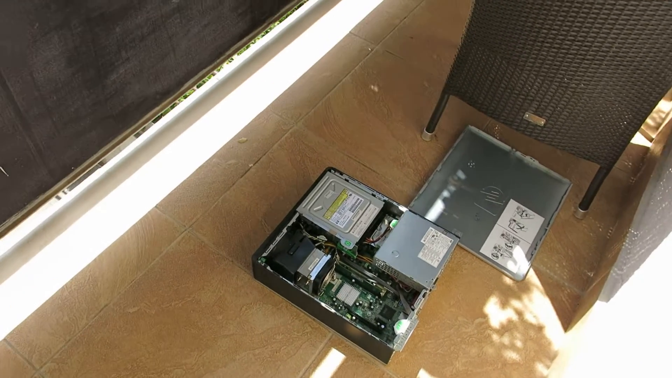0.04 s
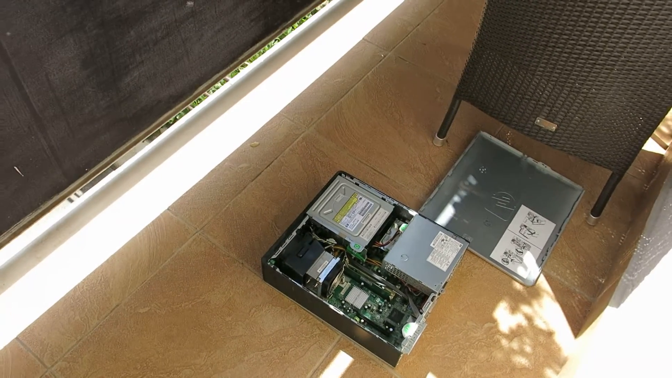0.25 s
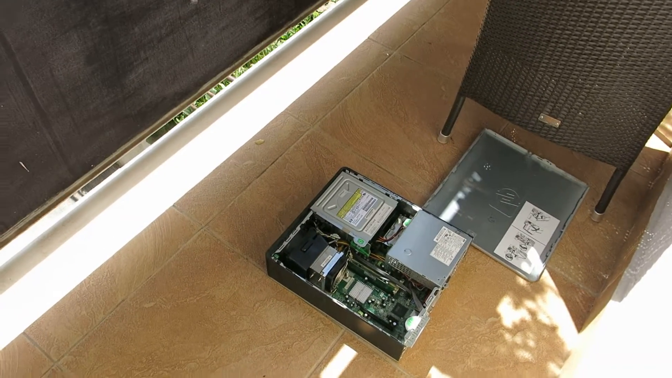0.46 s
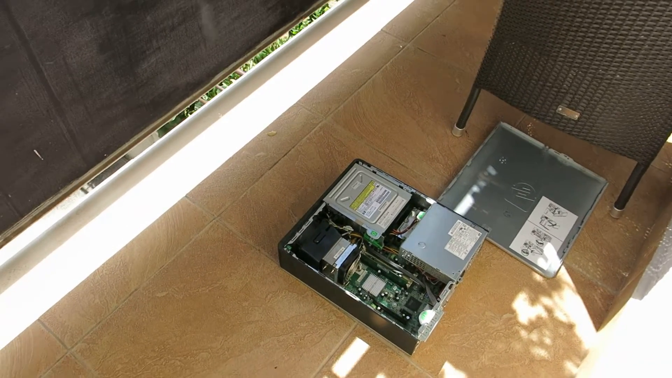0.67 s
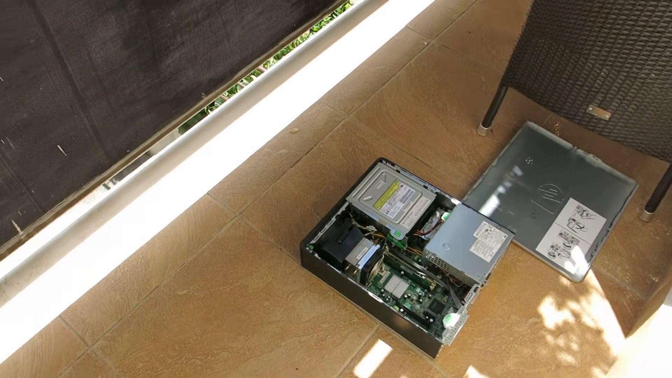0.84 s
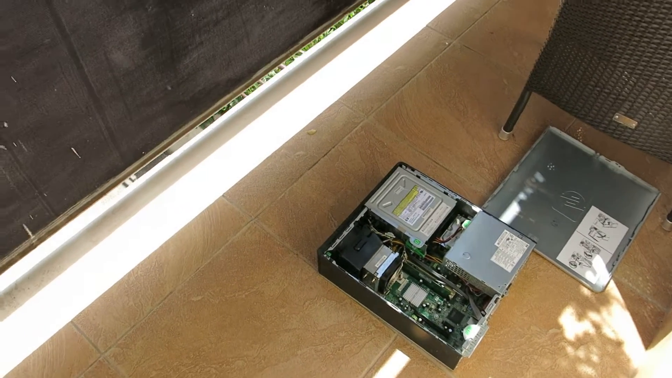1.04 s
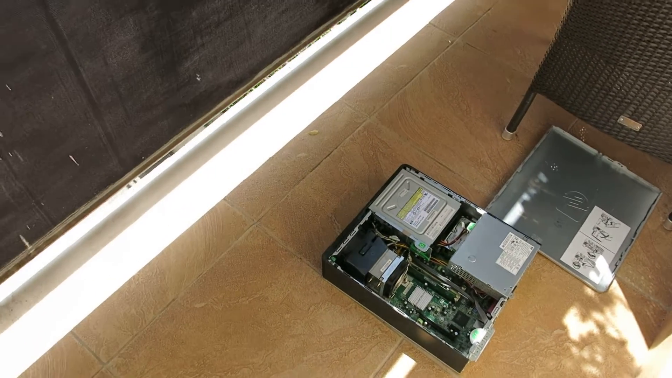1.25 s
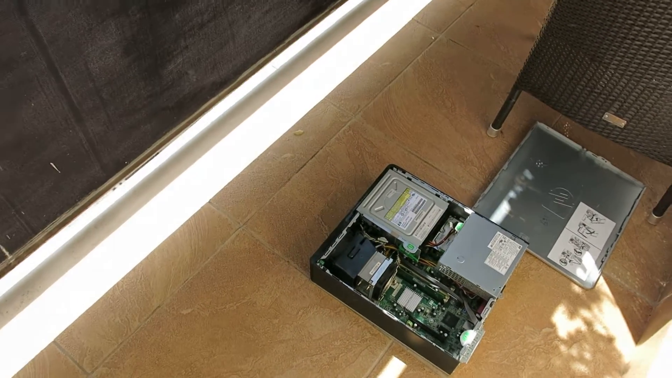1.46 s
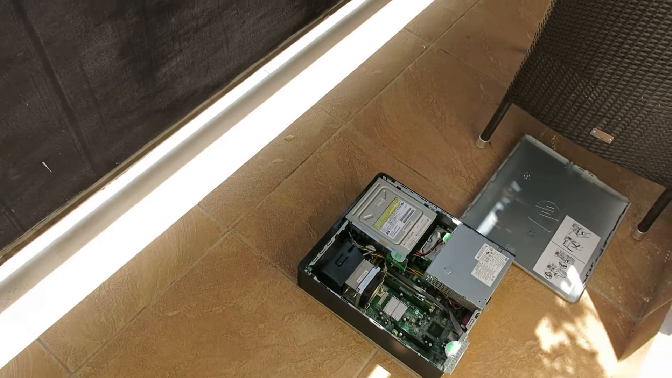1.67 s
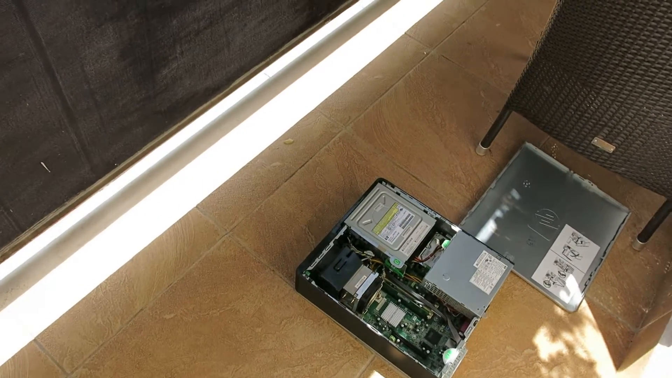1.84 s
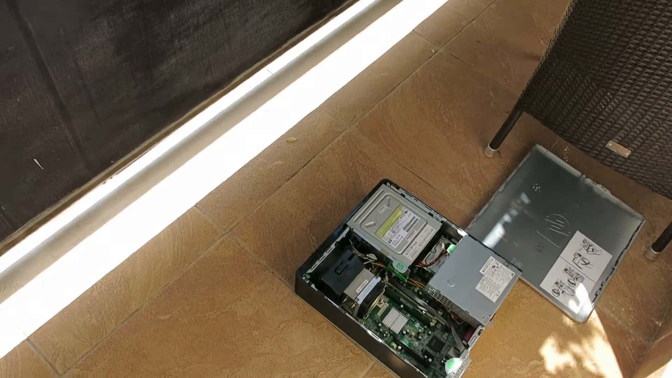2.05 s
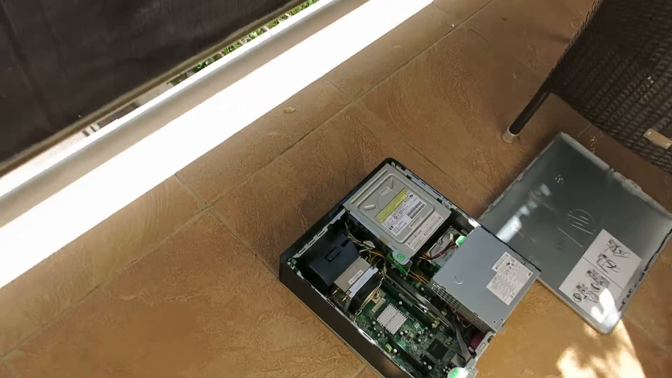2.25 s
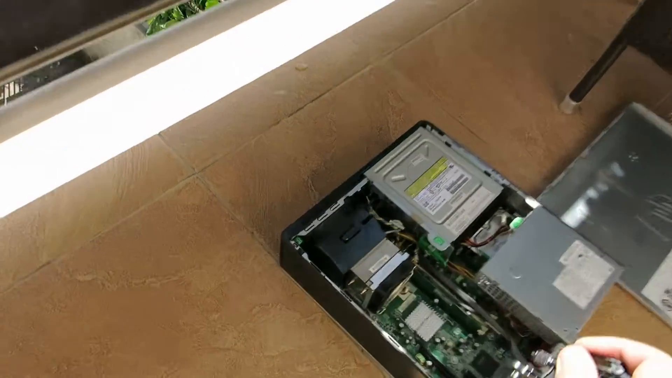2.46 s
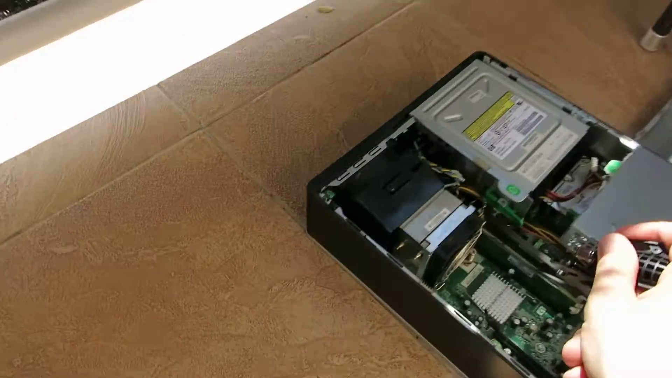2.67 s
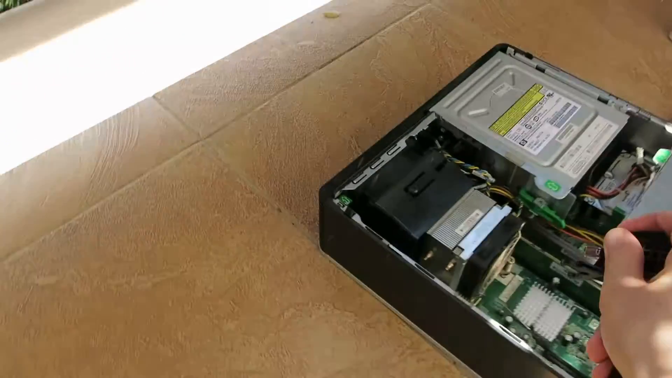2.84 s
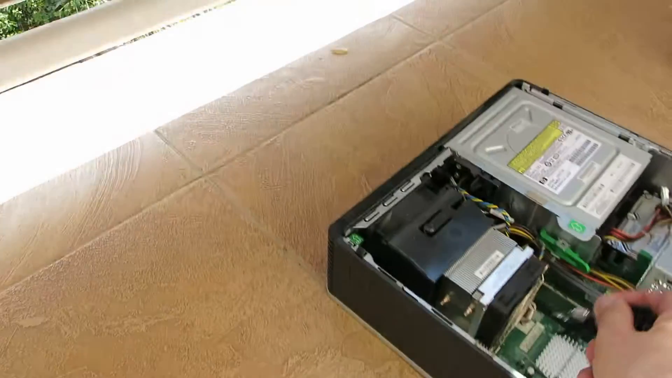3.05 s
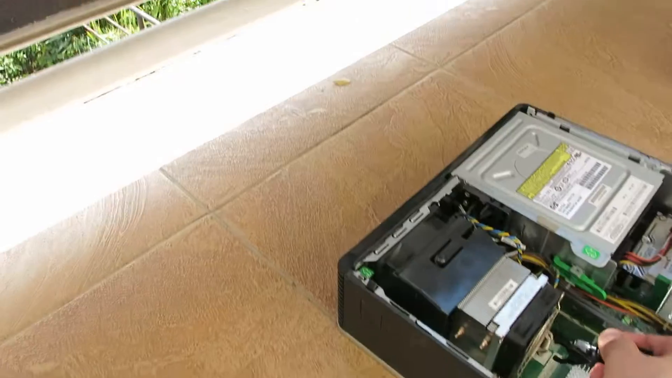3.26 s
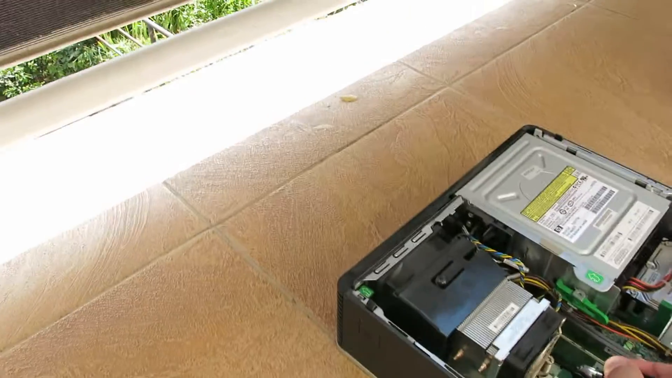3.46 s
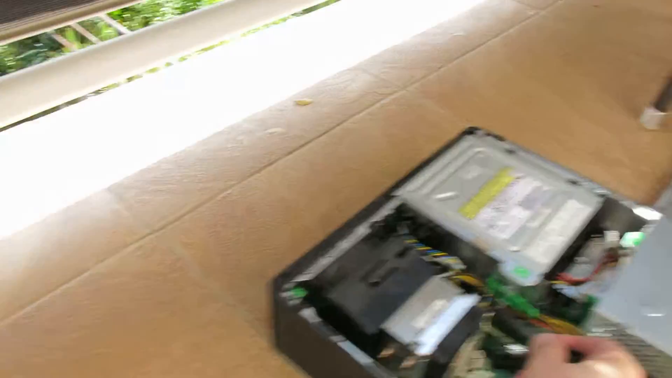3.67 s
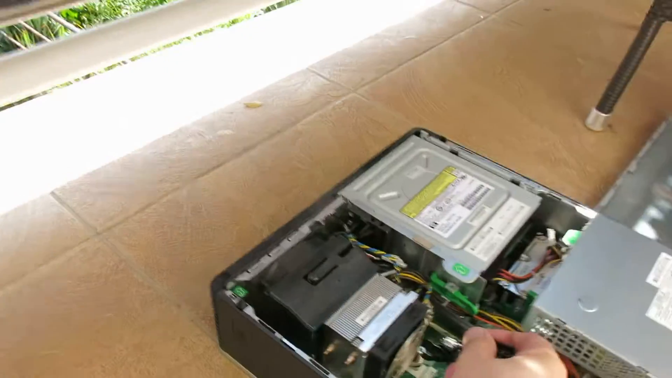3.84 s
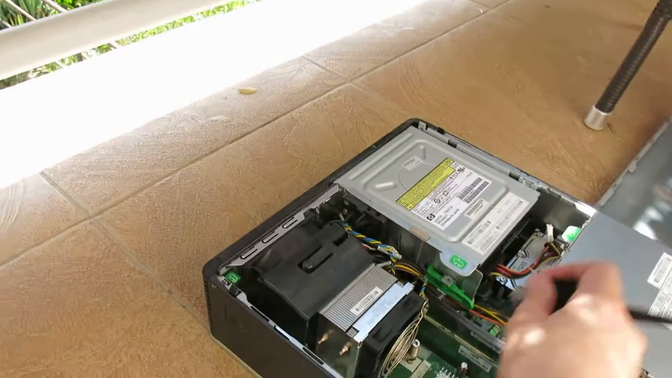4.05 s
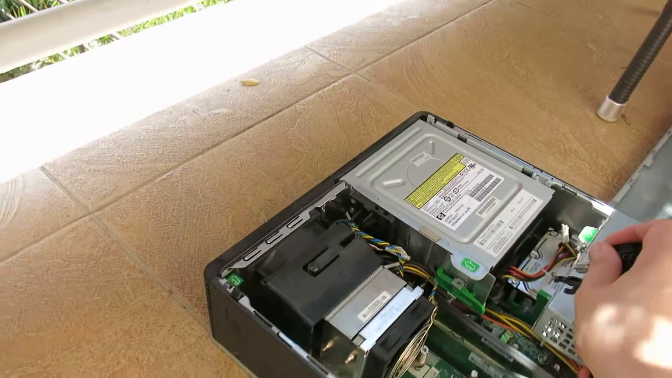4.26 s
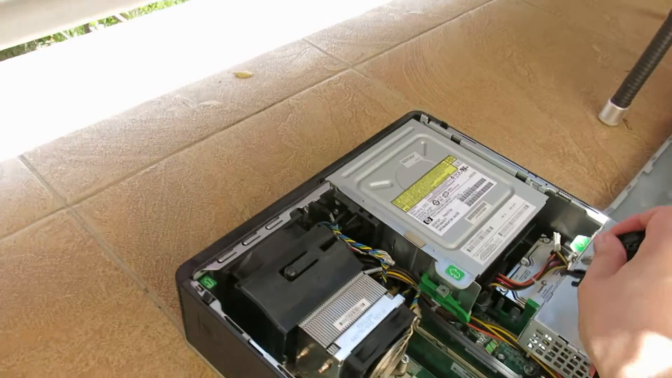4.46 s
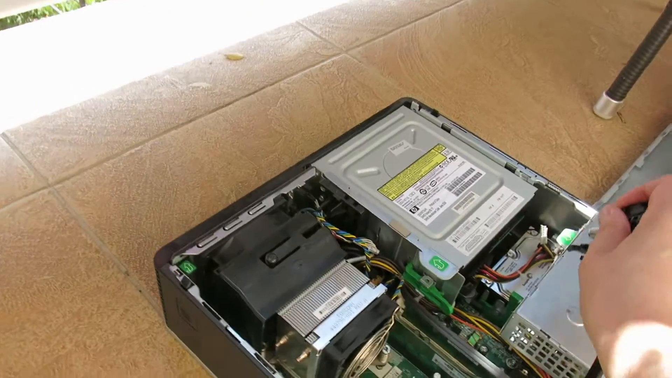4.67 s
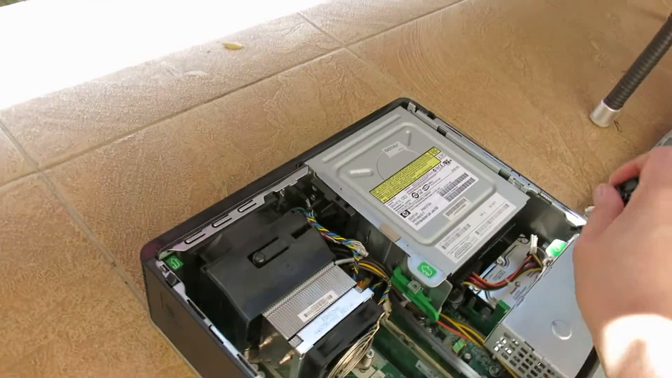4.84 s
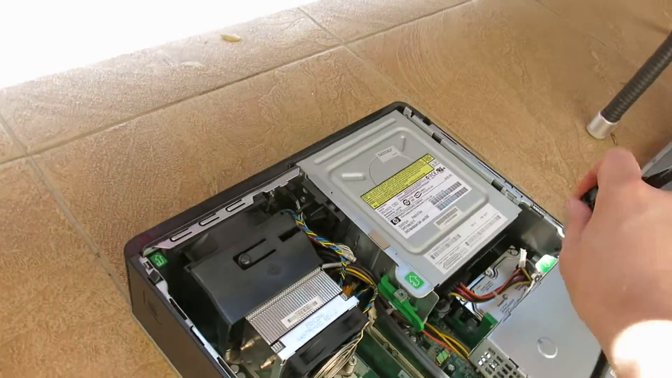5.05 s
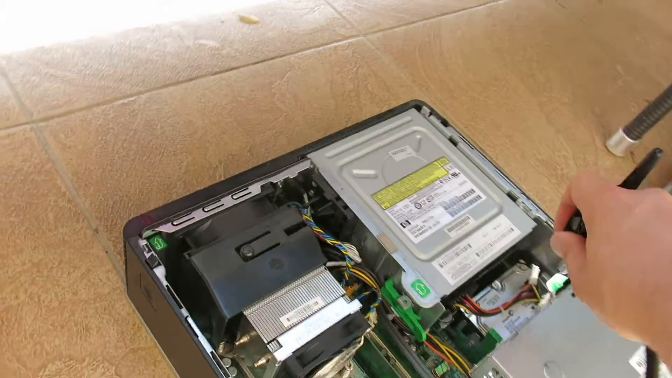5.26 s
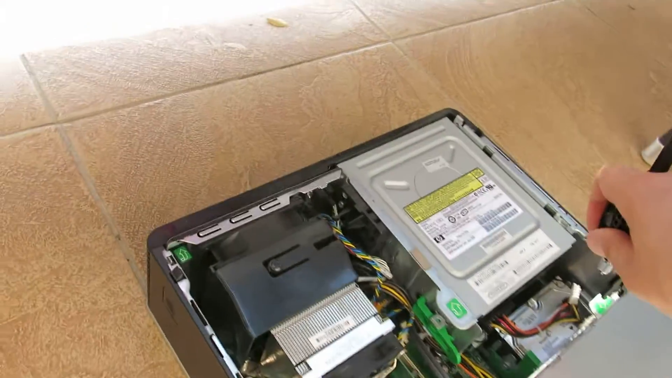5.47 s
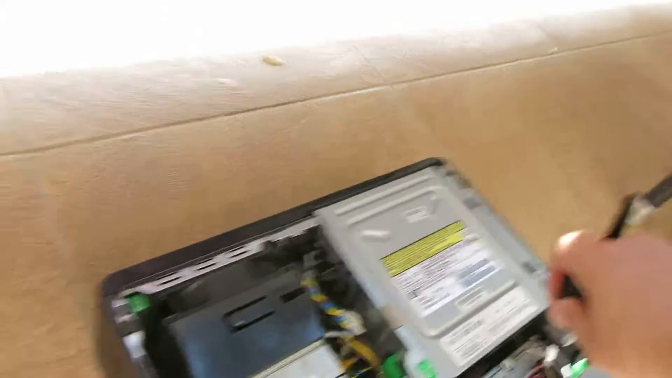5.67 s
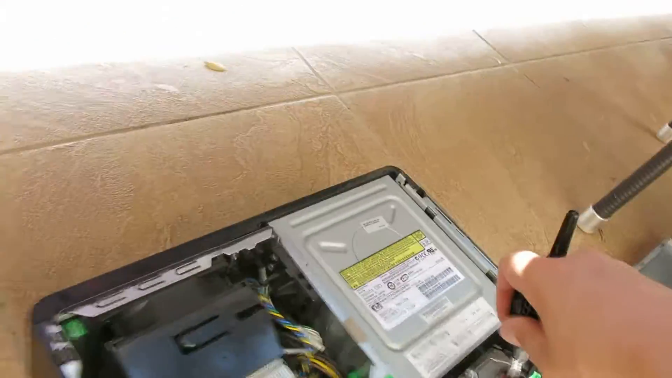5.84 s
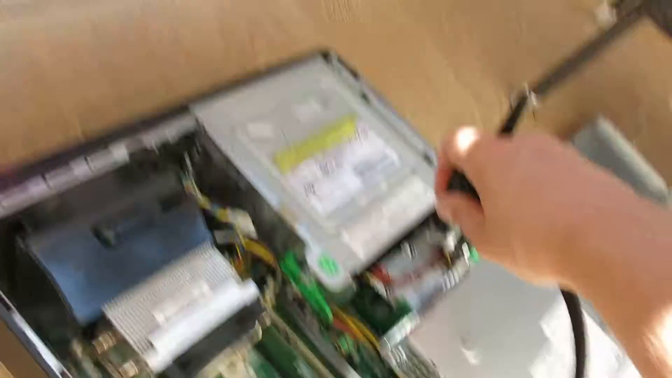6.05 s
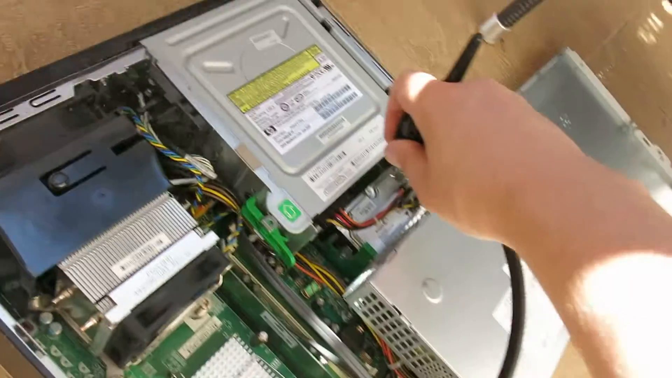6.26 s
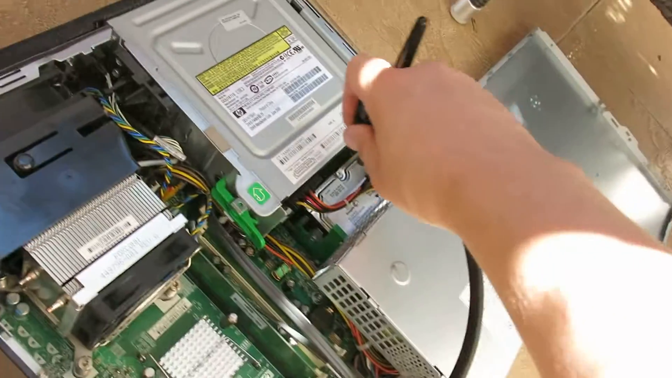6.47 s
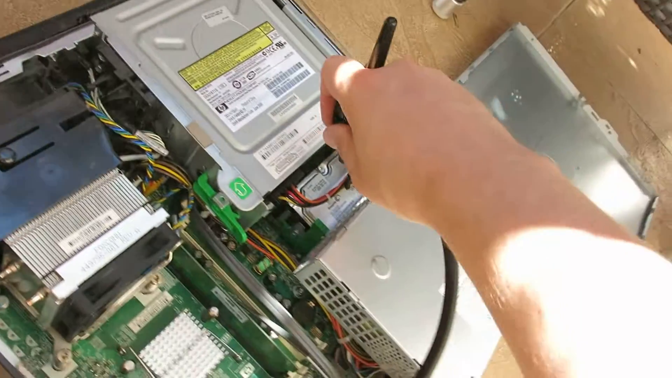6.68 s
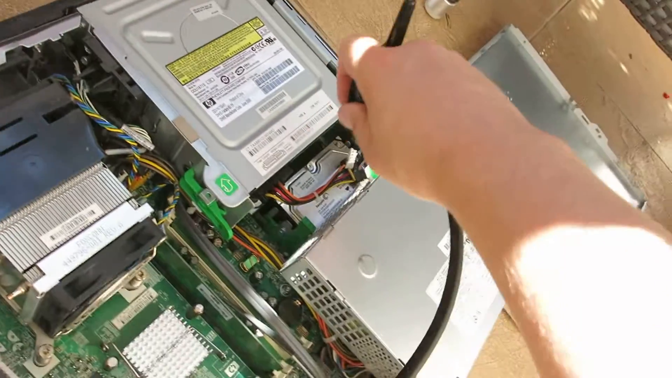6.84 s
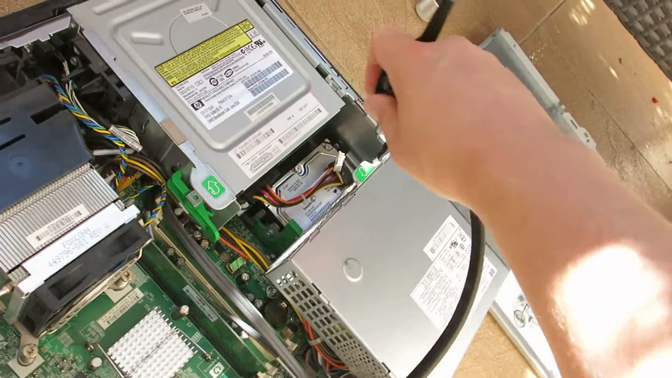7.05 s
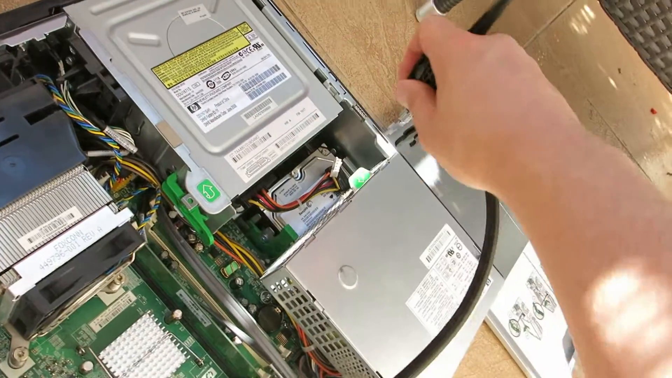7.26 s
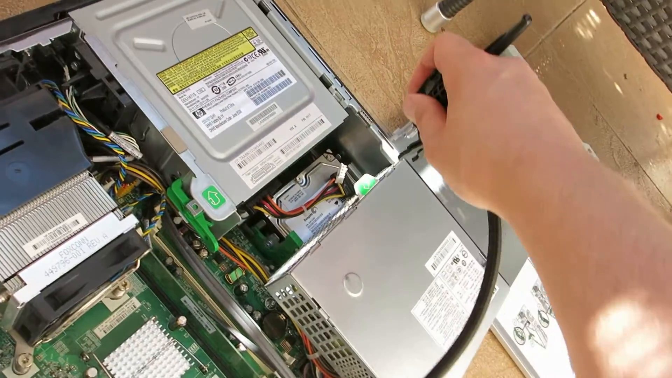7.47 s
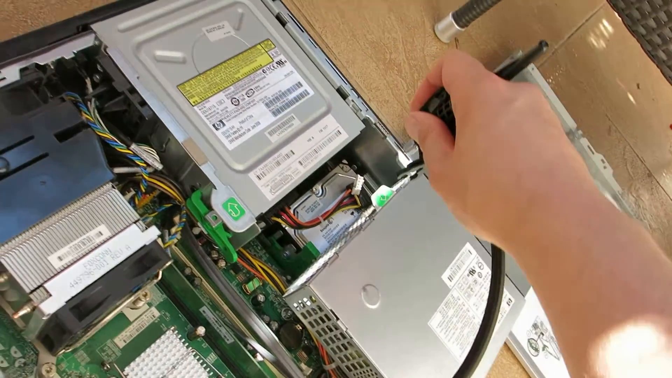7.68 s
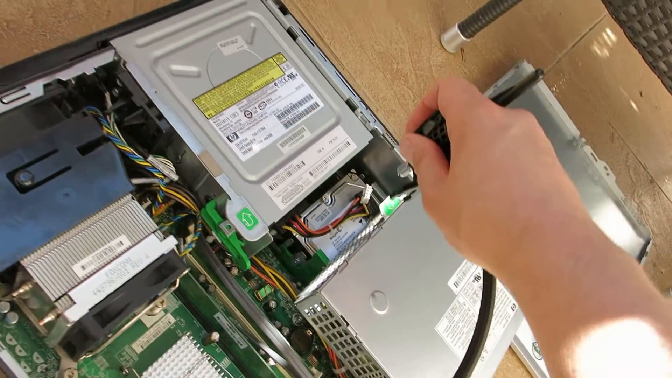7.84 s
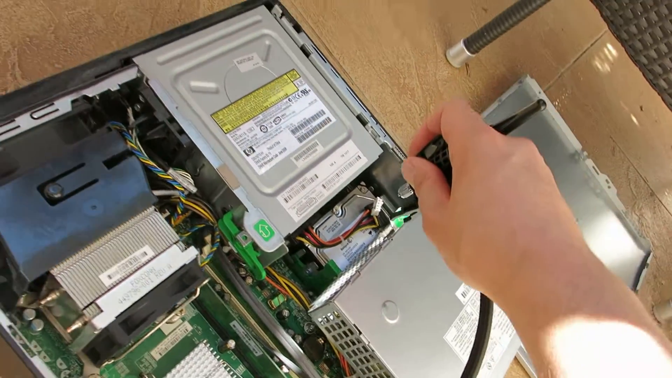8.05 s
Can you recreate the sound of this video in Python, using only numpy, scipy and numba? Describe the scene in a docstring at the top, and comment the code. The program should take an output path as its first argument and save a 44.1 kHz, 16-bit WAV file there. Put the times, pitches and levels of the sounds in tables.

```python
"""A machine drones outside a balcony, a blow gun clicks in the hand and its hose slides; then the valve opens.
The air jet hisses across the circuit board, drive bay and sheet-metal edges of an open computer case, whistles
in slots and rings the hollows. Machine and whistles are wavering sines and narrow noise; the air is coloured
noise whose levels follow the sweep. A phone close by turns its gain down on loud sound, pushing the drone down."""
import sys
import numpy as np
from scipy import signal
from scipy.fft import irfft, next_fast_len
from scipy.io import wavfile
from scipy.ndimage import uniform_filter1d
from numba import njit

SR = 44100
rng = np.random.default_rng(int(sys.argv[2]) if len(sys.argv) > 2 else 0)


def persist_wave(psi):
    """Save psi, clipped to +-1, as 16-bit WAV."""
    counts = np.round(np.clip(psi, -1, 1) * 32767).astype(np.int16)
    wavfile.write(sys.argv[1], SR, np.atleast_2d(counts).T)


N = 357651

T = np.arange(N) / SR
FREQS = np.maximum(np.arange(N // 2 + 1) * SR / N, 1)
GAIN_RANGE_DB = 21  # how far the phone can turn down

# All table levels are mix levels, before the lift of the jet in scene() and the phone's gain in record().


def undb(db):
    """Decibels to gain."""
    return 10 ** (np.asarray(db) / 20)


def curves(table):
    """The columns of a table, joined by straight lines in time."""
    s, *columns = np.transpose(table)
    return [np.interp(T, s, column) for column in columns]


def colour(points):
    """Gain at every frequency from (Hz, dB) points, joined along log frequency."""
    hz, db = np.transpose(points)
    return undb(np.interp(np.log(FREQS), np.log(hz), db))


def resonance(hz, half_width_hz):
    """Steep-sided gain of one resonance, halved at half_width_hz from its centre."""
    return 1 / (1 + ((FREQS - hz) / half_width_hz) ** 2)


def unit(x):
    """Scale a stereo sound so that its centre has rms 1."""
    centre = x.mean(axis=0)
    return x / np.sqrt(np.mean(centre ** 2))


def noise(gain, likeness):
    """Stereo noise of a given colour; likeness is the share of its power common to both sides."""
    size = next_fast_len(N, True)
    bins = np.arange(size // 2 + 1) * SR / size
    z = rng.standard_normal((3, len(bins))) + 1j * rng.standard_normal((3, len(bins)))
    gain = np.array([np.interp(bins, FREQS, g) for g in np.atleast_2d(gain)])
    spectrum = gain * (np.sqrt(likeness) * z[0] + np.sqrt(1 - likeness) * z[1:])
    return unit(irfft(spectrum, size)[:, :N])


def walk(rate_hz):
    """Smooth random drift with a spread of 1, drawing about rate_hz new values a second."""
    hold = max(int(SR / rate_hz), 1)
    steps = rng.standard_normal(4096)[np.arange(N) // hold % 4096]
    slewed = uniform_filter1d(uniform_filter1d(steps, hold), hold)
    return slewed / slewed.std()


def swell(s, spread_s):
    """A bell-shaped rise and fall centred on s."""
    return np.exp(-.5 * np.minimum(((T - s) / spread_s) ** 2, 100))


def ramp(s, length_s):
    """A smooth step from 0 to 1, half way up at s."""
    return .5 + .5 * np.sin(np.pi * np.clip((T - s) / length_s, -.5, .5))


# tones of the droning machine: pitch_hz, waver_hz, first_level_db, later_level_db (all trimmed 0.5 dB in play)
DRONE_TONES = [(66.3, 1.33, -49, -47), (135.5, 2.8, -38.5, -52), (187, 4.2, -51.5, -46),
               (273.3, 1.26, -45.5, -43.5), (447, 7.42, -46.5, -46.5), (691, 2.1, -55, -47),
               (744, 5.43, -44, -55), (906, 13.55, -46.5, -44.5), (1596, 32, -45.5, -45.5)]
# colour of the street wash: freq_hz, gain_db
STREET_COLOUR = [(15, -43), (25, -15), (97, -6.5), (130, -1.5), (161, -5), (270, -5), (301, -4),
                 (734, -6.5), (818, -8), (911, -5), (1130, -10), (1890, -8.5), (3160, -23), (6050, -21.5),
                 (16000, -31)]
# loudness of the street wash: time_s, level_db (lifted 2 dB in play)
STREET_LEVEL = [(0.0, -38), (0.76, -38), (1.13, -35), (2.3, -37)]
WHINE_HZ, WHINE_DB = 3010, -52.5  # centre of a thin whine of the same machine


def outside():
    """A machine drones with wavering, patchy tones over the wash of the street and a thin hiss."""
    level_db, = curves(STREET_LEVEL)
    street = noise(colour(STREET_COLOUR), 0.13) * undb(level_db + 2 + .5 * walk(20))
    drone = 0
    for hz, waver_hz, first_db, later_db in DRONE_TONES:
        phase = 2 * np.pi * np.cumsum(hz + waver_hz * walk(20)) / SR
        tone_db = np.interp(T, [.4, 2.3], [first_db, later_db]) + 3.4 * walk(7)
        # many paths: each port hears the tone flicker in its own way
        scatter = np.array([walk(25.16), walk(25)])
        drone = drone + undb(tone_db + 2 * scatter - 0.5) * np.sin(phase + .5 * scatter[::-1])
    whine_phase = 2 * np.pi * np.cumsum(WHINE_HZ + 4 * walk(20)) / SR
    whine = undb(WHINE_DB + 1.2 * walk(20)) * np.sin(whine_phase)
    thin_hiss = undb(-44.5) * noise(resonance(4770, 810), 0.53)
    return street + drone + whine + thin_hiss


# clicks of gun and trigger: start_s, level_db, ring_hz
CLICKS = [(.5852, -23, 5470), (0.9326, -11, 6000), (0.9336, -18, 7000), (1.0761, -16, 6400),
          (1.0768, -18.5, 6270), (1.6049, -24, 6000), (2.0977, -28, 6000), (2.346, -5.5, 4460),
          (2.3485, -20, 5000), (2.3806, -6.5, 8150), (2.386, -3, 8200)]
CRACK_S, CLICK_TAIL_S, CLICK_TAIL_DB = .00045, .02, -23  # decay times; tail against crack


def clicks():
    """Each click is a sharp crack of ringing noise with a short, softer echo off the balcony."""
    body = colour([(300, -24), (2500, -16), (4000, 0.5), (8000, 0), (16000, -5)])
    out = 0
    for s, db, ring_hz in CLICKS:
        age = np.clip(T - s, 0, 1)
        decay = np.exp(-age / CRACK_S) + undb(CLICK_TAIL_DB) * np.exp(-age / CLICK_TAIL_S)
        ringing = noise(body * (1 + 2.8 * resonance(ring_hz, 700)), 0.52)
        out = out + undb(db) * (T >= s) * decay * ringing
    return out


# the hose slides: centre_s, spread_s, level_db
SLIDES = [(.72, 0.22, -47), (.95, .025, -48), (1.064, 0.034, -36.5), (1.35, 0.34, -44),
          (1.628, 0.026, -38.5), (1.9, 0.087, -49), (2.29, 0.023, -40.5)]


def hose_slides():
    """The sliding hose makes soft swells of bright friction noise."""
    friction = colour([(1500, -15), (3500, -0.5), (6000, 4), (8000, -7), (11000, -9.5), (16000, -45)])
    return noise(friction, 0.3) * sum(undb(db) * swell(s, spread_s) for s, spread_s, db in SLIDES)


# steady air as the hand moves about: time_s, nozzle_hiss_db, wash_over_parts_db
FLOW = [(2.42, -20, -29), (2.82, -17.5, -23), (3.0, -30, -30), (3.48, -29.5, -25), (3.98, -30.5, -22.5),
        (4.05, -33.5, -37), (4.3, -33.5, -32), (4.6, -29.5, -32.5), (5.05, -29, -34.5), (5.4, -29, -23.5),
        (5.85, -26.5, -30.5), (6.12, -24, -25.5), (6.45, -27, -25), (6.97, -28, -27.5), (7.2, -31.5, -30.5),
        (7.62, -27, -28), (7.9, -28.5, -30), (8.1, -28, -30.5)]
LEAVES_BOARD_S, REACHES_EDGE_S, DRIFT_S = 4.0, 6.05, 0.23  # board to drive bay, then also to the edge
EDGE_SHARE = 0.63  # share of the wash power that ends up on the edge


def wash():
    """Power of the steady wash on each part, as the gun works its way across the case."""
    power = undb(curves(FLOW)[1]) ** 2
    past_board = ramp(LEAVES_BOARD_S, DRIFT_S)
    on_edge = EDGE_SHARE * ramp(REACHES_EDGE_S, DRIFT_S)
    return {"board": power * (1 - past_board), "bay": power * past_board * (1 - on_edge), "edge": power * on_edge}


# the jet crosses a part of the case: start_s, end_s, hiss_off_part_db, bright_spray_off_rim_db, part
STRIKES = [(2.4, 2.86, -26.5, -31, "board"), (2.854, 2.97, -19.5, -37, "bay"),
           (2.91, 3.052, -31, -42, "edge"), (2.998, 3.15, -19, -33, "board"),
           (3.183, 3.283, -21, -23.5, "board"), (3.32, 3.384, -21.5, -22, "board"),
           (3.559, 3.693, -20, -26, "board"), (3.77, 3.93, -27, -24.5, "board"),
           (3.802, 4.013, -26, -40, "edge"), (3.955, 4, -22, -33, "bay"), (4.118, 4.163, -28, -45, "bay"),
           (5.076, 5.146, -28.5, -33, "bay"), (5.243, 5.287, -20, -32, "bay"),
           (5.335, 5.412, -22.5, -29, "board"), (5.345, 5.68, -35, -36, "edge"),
           (6.073, 6.86, -21, -37, "edge"), (6.1, 6.233, -25.5, -39, "bay"), (6.29, 6.38, -22, -33, "edge"),
           (6.885, 6.936, -24, -17.5, "edge"), (7.031, 7.119, -22, -29, "edge"),
           (7.764, 7.845, -21.5, -27.5, "edge"), (7.765, 7.84, -24, -36, "bay")]
STRIKE_FADE_S, SPRAY_FADE_S = 0.068, 0.071  # time the jet takes to slide onto a part or off it


def sweep():
    """Each strike swells, holds and fades on top of the wash: power on each part, and power of the spray."""
    power, spray = wash(), 0
    for start, end, db, spray_db, part in STRIKES:
        on_part = ramp(start, STRIKE_FADE_S) * (1 - ramp(end, STRIKE_FADE_S))
        on_rim = ramp(start, SPRAY_FADE_S) * (1 - ramp(end, SPRAY_FADE_S))
        power[part] = power[part] + undb(db) ** 2 * on_part
        spray = spray + undb(spray_db) ** 2 * on_rim
    return power, spray


def reflections(x, strength, drift_s, count=7):
    """Echoes off case walls and tiles; their paths shift with the hand, so ripples wander through the hiss."""
    out = x.copy()
    for lag_s in np.geomspace(.0011, .009, count) * rng.uniform(.85, 1.15, count):
        path_s = lag_s + drift_s * walk(1.5)
        for side in range(2):
            side_lag_s = rng.uniform(0, .00012)
            out[side] += strength * np.interp(T - path_s - side_lag_s, T, x[side])
    return out / np.sqrt(1 + count * strength ** 2)


# side from which the struck hiss comes: time_s, left_minus_right_db
PAN = [(2.4, 3), (5.65, 3.5), (5.82, 17), (6.05, 0), (7.0, 0.5), (7.78, 3.5), (8.1, 0)]
# colour of air striking the circuit board: freq_hz, gain_db
BOARD = [(1500, -38), (2850, -13.5), (3300, -1), (4000, 2), (4600, 1.5), (5600, 3), (6600, 6.5), (7800, 0),
         (9000, -2.5), (11000, -10), (15000, -31)]
# colour of air striking the drive bay: freq_hz, gain_db
BAY = [(1800, -37), (2800, -10.5), (3400, -3.5), (3900, -1), (4500, -1), (5300, -4), (6300, 0.5),
       (7500, -6.5), (10000, -20), (15000, -20)]
# colour of air striking the sheet-metal edges: freq_hz, gain_db
EDGE = [(2000, -37), (2950, -9), (3350, -2), (4000, -6), (4850, 8.5), (5250, 7.5), (5700, 7), (6250, 7.5),
        (7000, 2), (8200, -10), (11000, -12), (15000, -35)]
# colour of air leaving the nozzle: freq_hz, gain_db
NOZZLE = [(3000, -20), (6000, 2), (8200, 1.5), (9700, 4), (11200, 4.5), (12500, 4), (13800, 1),
          (14800, 4.5), (15800, -1.5)]


def hiss(ports, power, spray):
    """Air hisses at the nozzle and, coloured by their shape, on the parts that it strikes."""
    nozzle_db, _ = curves(FLOW)
    pan_db, = curves(PAN)
    # from over the case, sound near 6.7 kHz reaches the two ports in opposite phase
    twist = np.exp(1j * np.pi * (1 + np.tanh((FREQS - 6700) / 1150)) * np.array([[0], [-1]]))
    struck = np.sqrt(power["board"]) * noise(ports * twist * colour(BOARD), 0.85)
    struck = struck + np.sqrt(power["bay"]) * noise(ports * twist * colour(BAY), 0.98)
    struck = struck + np.sqrt(power["edge"]) * noise(ports * colour(EDGE), 0.72)
    flutter_db = 0.82 * walk(60) + 0.15 * walk(25)
    struck = struck * undb(np.array([pan_db, -pan_db]) / 2 + flutter_db)
    # close to sheet metal, a very short echo lifts the nozzle hiss near 4.6, 9.2 and 13.8 kHz
    comb = 1 + .5 * np.exp(2j * np.pi * FREQS / 4620)
    near = np.interp(T, [5.85, 6.1], [0, 1])
    open_air = np.sqrt(1 - near) * noise(ports * colour(NOZZLE), 0.1)
    by_metal = np.sqrt(near) * noise(ports * comb * colour(NOZZLE), 0.1)
    nozzle_level = np.sqrt(undb(nozzle_db) ** 2 + spray)
    nozzle = (open_air + by_metal) * nozzle_level * undb(0.097 * flutter_db + 1.08 * walk(50))
    return reflections(struck + nozzle, strength=0.2, drift_s=0.000127)


@njit
def bandpass(x, hz, width_hz):
    """State-variable band-pass with a moving centre."""
    y, band, low = np.empty(len(x)), 0., 0.
    for i in range(len(x)):
        g, damping = np.tan(np.pi * hz[i] / SR), width_hz / hz[i]
        v = (band + g * (x[i] - low)) / (1 + g * (g + damping))
        band, low, y[i] = 2 * v - band, low + 2 * g * v, damping * v
    return y


def ring(x, hz, width_hz, strength):
    """Lift one moving resonance out of a noise, evening out the overall level."""
    peak = unit(np.array([bandpass(side, hz, float(width_hz)) for side in x]))
    out = x + strength * peak
    return out / np.sqrt(uniform_filter1d(out.mean(axis=0) ** 2, size=6000))


# air caught in the case: time_s, rush_in_narrow_gaps_db, roar_in_deep_hollows_db
ROAR = [(2.7, -39, -52), (3.02, -31, -40), (3.15, -40.5, -55), (3.52, -41.5, -55), (3.66, -34.5, -53),
        (3.97, -33, -51), (4.06, -43, -44), (4.24, -47, -40), (4.62, -40.5, -35), (5.02, -36, -33),
        (5.26, -26.5, -35), (5.5, -30.5, -39.5), (6.12, -29, -37), (6.4, -35, -42.5), (7.05, -35, -44),
        (7.5, -35, -38.5), (7.78, -36, -42), (7.92, -36.5, -35.5)]
# where the gun points: time_s, gap_pitch_hz, gap_ring_strength (plain ratio), hollow_pitch_hz
AIM = [(2.8, 950, 0.44, 640), (2.9, 1150, 0.55, 960), (3.1, 1530, 0.045, 850), (3.9, 1310, 0.073, 555),
       (4.55, 1280, 0.86, 486), (5.0, 1235, 1.6, 670), (5.3, 1236, 0.41, 770), (6.1, 1080, 0.6, 736),
       (7.0, 1080, 0.77, 705), (7.55, 1040, 0.49, 514), (7.9, 1070, 0.65, 725)]
# the jet blows straight into a cavity: centre_s, spread_s, gap_rush_db, hollow_roar_db
BLASTS = [(2.852, 0.058, -27.5, -23), (2.94, .038, -28, -46), (4.17, 0.05, -33.5, -38)]
# colour of the rush in the gaps: freq_hz, gain_db
GAPS = [(300, -30), (900, -12.5), (1200, -3.5), (1500, -6.5), (1650, -3.5), (1850, -3), (2250, -4.5),
        (2650, -7), (3300, -19), (5000, -55)]
# colour of the roar in the hollows: freq_hz, gain_db
HOLLOW = [(60, -17), (200, -11.5), (290, -10), (410, -1.5), (520, -2.5), (700, -1), (860, -1), (1050, -9),
          (1600, -2.5), (3000, -54)]


def cavities(ports):
    """The jet blows across gaps and hollows of the case; their resonances slide as the nozzle moves."""
    gaps_db, hollow_db = curves(ROAR)
    gap_hz, gap_ring, hollow_hz = curves(AIM)
    gap_blasts = sum(undb(db) * swell(s, spread_s) for s, spread_s, db, _ in BLASTS)
    hollow_blasts = sum(undb(db) * swell(s, spread_s) for s, spread_s, _, db in BLASTS)
    rush = np.hypot(undb(gaps_db), gap_blasts)
    roar = np.hypot(undb(hollow_db), hollow_blasts)
    gaps = reflections(noise(ports * colour(GAPS), 0.57), strength=0.2, drift_s=.00016)
    gaps = ring(gaps, 1.77 * gap_hz, 320, 0.22)  # the gap's second mode
    gaps = ring(gaps, gap_hz, 127, gap_ring)
    hollow = ring(noise(ports * colour(HOLLOW), 0.66), hollow_hz, 290, 0.87)
    return gaps * rush * undb(0.82 * walk(40)) + hollow * roar * undb(1.6 * walk(30))


# the two microphone ports face different ways: freq_hz, left_minus_right_db
PORTS = [(200, 0.5), (700, 2.5), (1100, 3.5), (1700, 4), (2400, 0), (3500, -2), (4900, 1.5), (6200, -8),
         (7300, -5), (8500, 7.5), (10000, 6.5), (12000, 15), (14000, 20), (16000, 3.5)]
VALVE_S, VALVE_RISE_S = 2.378, .011
DEFLECT_DB = -15.5  # spray this loud halves the sound of the cavities


def blow_gun():
    """The valve opens within milliseconds and stays open; air that sprays off a rim misses the cavities."""
    ports = colour(PORTS) ** np.array([[.5], [-.5]])
    valve = np.clip((T - VALVE_S) / VALVE_RISE_S, 0, 1)
    power, spray = sweep()
    caught = 1 / (1 + spray / undb(DEFLECT_DB) ** 2)
    return valve * (hiss(ports, power, spray) + caught * cavities(ports))


# edge tones, some breathy and wide, some clear and narrow: start_s, end_s, pitch_hz, width_hz, level_db
WHISTLES = [(2.898, 3.037, 3770, 1000, -24), (3.064, 3.408, 8900, 930, -26),
            (4.176, 4.444, 4120, 660, -36.5), (5.06, 5.15, 4760, 120, -33),
            (5.207, 5.376, 4270, 130, -30.5), (5.72, 5.9, 5140, 590, -31.5), (6.08, 6.602, 4900, 10, -44),
            (6.595, 6.87, 4944, 23, -38), (6.1, 7.1, 6190, 33, -37), (6.958, 7.575, 1126, 120, -39)]


def edge_tones():
    """Slots whistle unsteadily, as narrow noise, while the jet lies across them."""
    out = 0
    for start, end, hz, width_hz, db in WHISTLES:
        gate = np.clip(np.minimum(T - start, end - T) / 0.016, 0, 1)
        out = out + undb(db) * gate * noise(resonance(hz, width_hz / 2), 0.61)
    return out


# the microphone overloads in the jet: centre_s, spread_s, level_db
OVERLOADS = [(3.225, 0.026, -42), (3.367, 0.015, -30), (3.67, 0.028, -46), (3.88, 0.026, -31),
             (6.91, 0.022, -33.5)]


def overloads():
    """The microphone overloads in the jet: low, muffled thumps, opposite in the two channels."""
    muffled = colour([(30, -24), (150, -2), (450, 0), (900, 1), (2000, -33), (6000, -50)])
    thump = noise(muffled, 0.96) * np.array([[1], [-.85]])
    return thump * sum(undb(db) * swell(s, spread_s) for s, spread_s, db in OVERLOADS)


# soft falling whoomps as the jet leaves a hollow: centre_s, spread_s, start_pitch_hz, end_pitch_hz, level_db
WHOOMPS = [(4.066, 0.025, 190, 127, -42.5), (7.886, 0.022, 174, 135, -45)]


def whoomps():
    """As the jet leaves a hollow, a short, wavering sine falls in pitch, stronger on the right."""
    out = 0
    for s, spread_s, start_hz, end_hz, db in WHOOMPS:
        fall_hz = np.interp(T, [s - spread_s, s + spread_s], [start_hz, end_hz])
        phase = 2 * np.pi * np.cumsum(fall_hz * (1 + 0.065 * walk(90))) / SR
        out = out + undb(db) * swell(s, spread_s) * np.sin(phase) * np.array([[.6], [1.4]])
    return out


def scene():
    """The jet is far louder than all else on the balcony, and louder still once it strikes the case close by."""
    excess_db = np.interp(T, [2.72, 2.92], [12, GAIN_RANGE_DB])
    jet = blow_gun() + edge_tones() + overloads() + whoomps()
    return outside() + clicks() + hose_slides() + undb(excess_db) * jet


def record(dry, target_db=-19, attack_s=0.0049, top_hz=15850):
    """The phone turns its gain down on loud sound, within its range, holds it there and cuts the top."""
    pole = np.exp(-1 / (attack_s * SR))
    power = signal.lfilter([1 - pole], [1, -pole], dry.mean(axis=0) ** 2)
    loudest = np.sqrt(np.maximum.accumulate(power) + 1e-12)  # never falls, so the gain never recovers
    gain = np.clip(undb(target_db) / loudest, undb(-GAIN_RANGE_DB), 1)
    lowpass = signal.ellip(10, .2, 80, top_hz, fs=SR, output="sos")
    return signal.sosfilt(lowpass, np.clip(dry * gain, -1, 1))


dry = scene()
out = record(dry)
persist_wave(out)
```